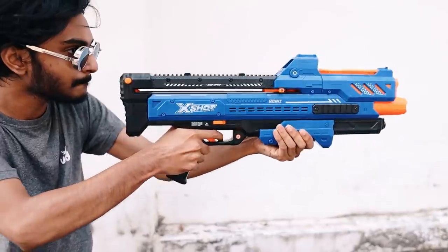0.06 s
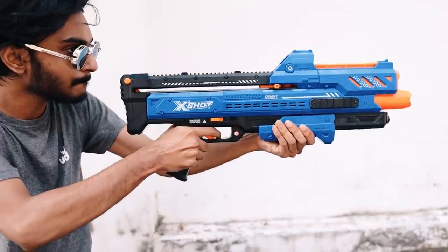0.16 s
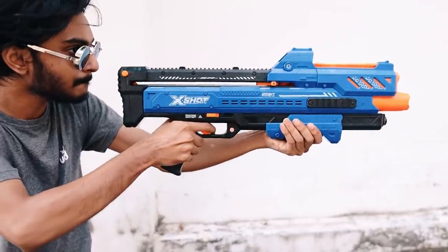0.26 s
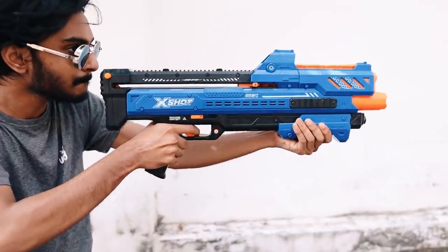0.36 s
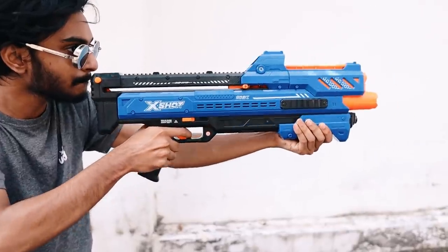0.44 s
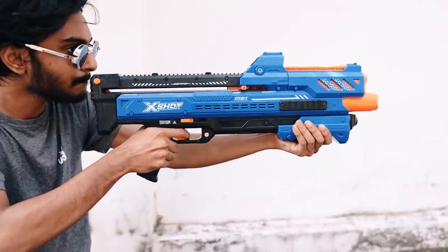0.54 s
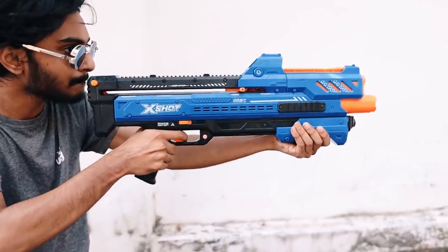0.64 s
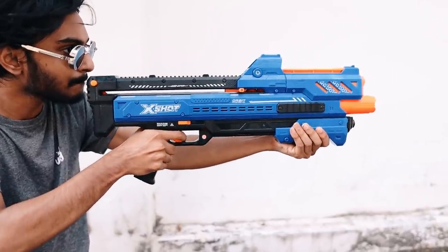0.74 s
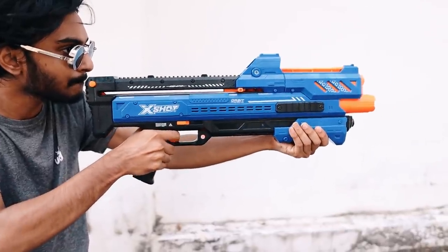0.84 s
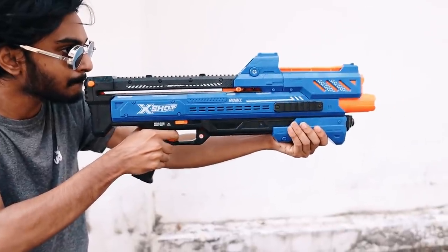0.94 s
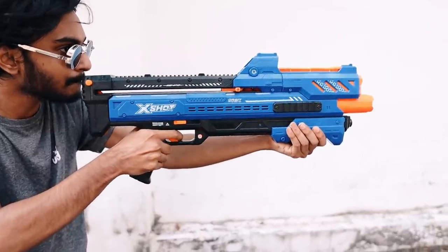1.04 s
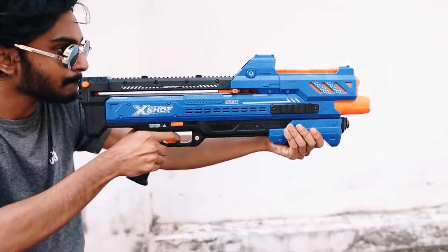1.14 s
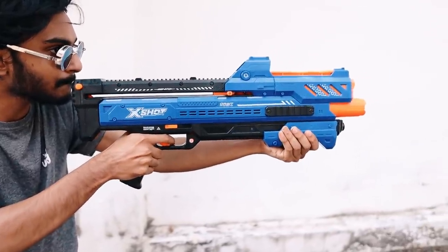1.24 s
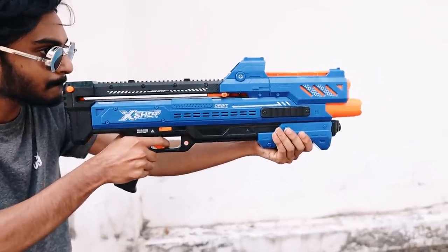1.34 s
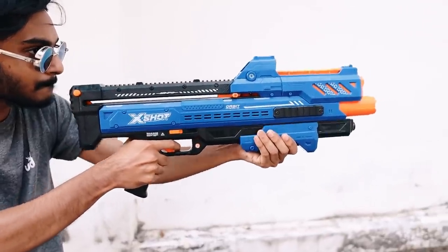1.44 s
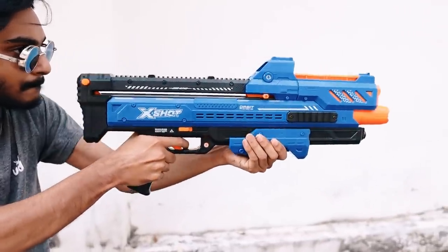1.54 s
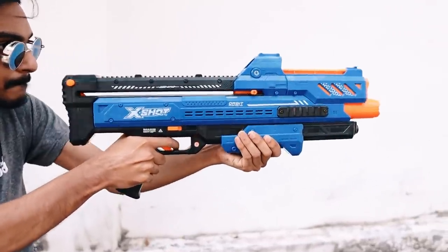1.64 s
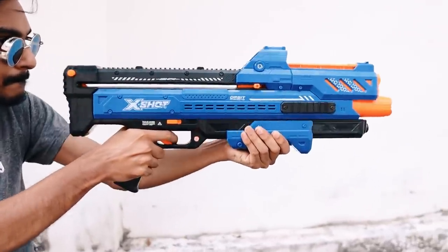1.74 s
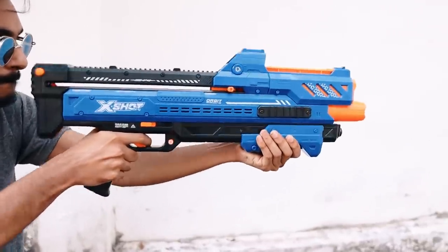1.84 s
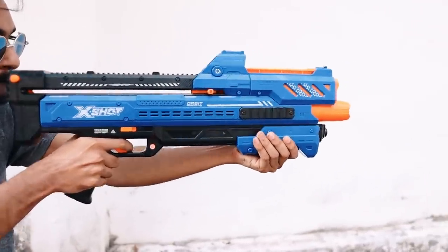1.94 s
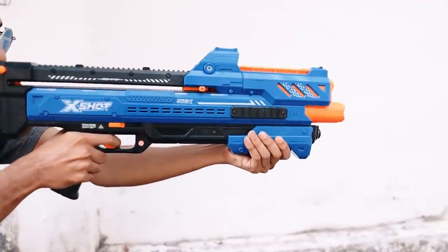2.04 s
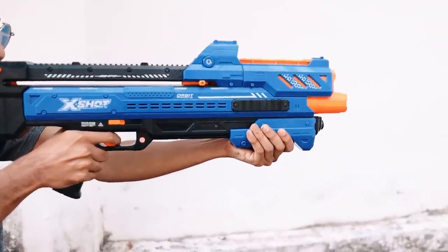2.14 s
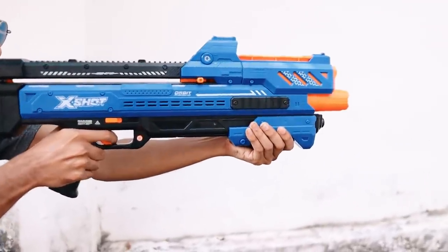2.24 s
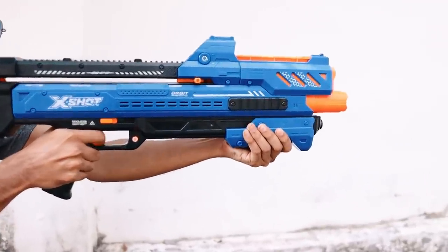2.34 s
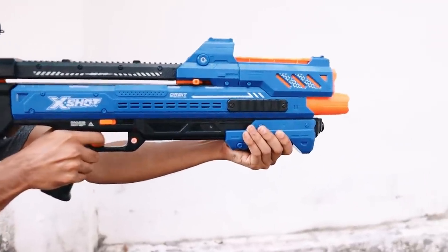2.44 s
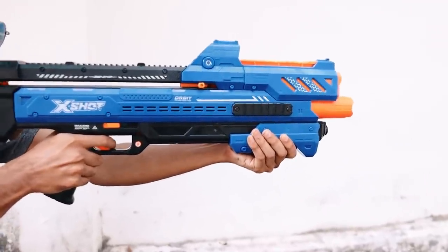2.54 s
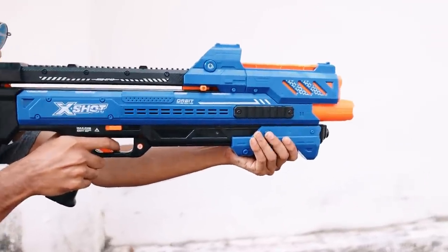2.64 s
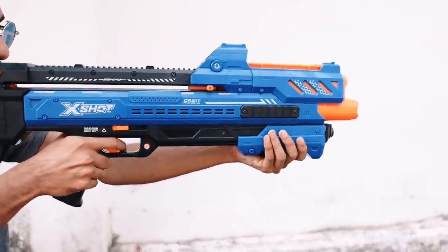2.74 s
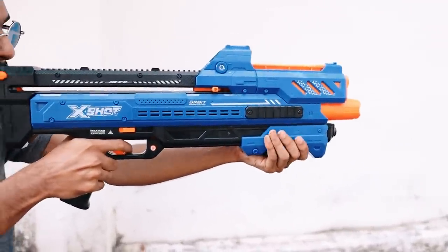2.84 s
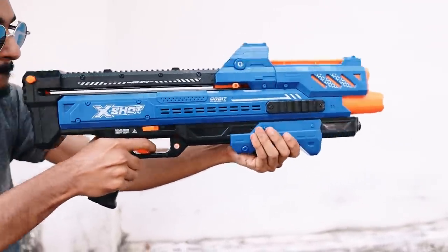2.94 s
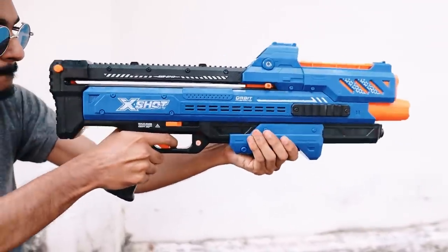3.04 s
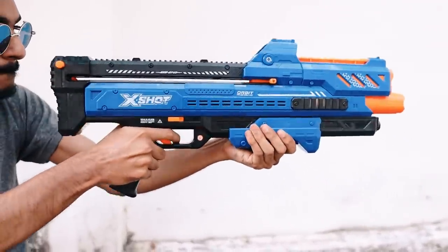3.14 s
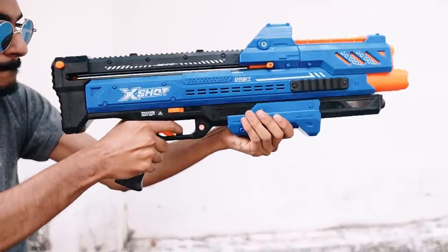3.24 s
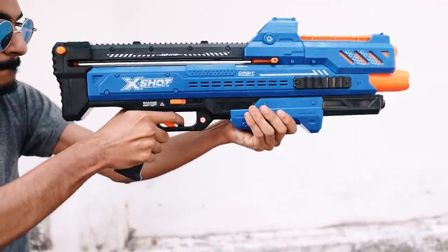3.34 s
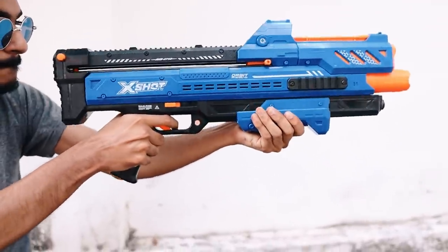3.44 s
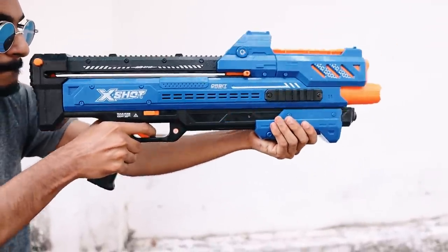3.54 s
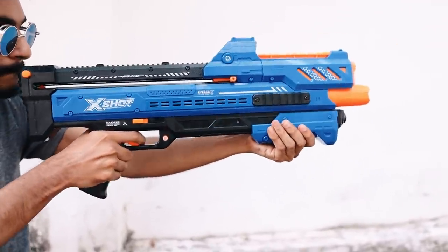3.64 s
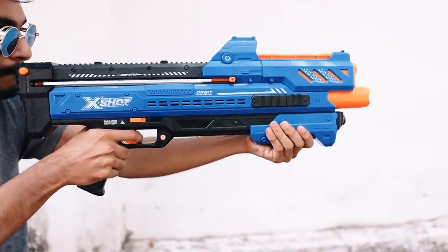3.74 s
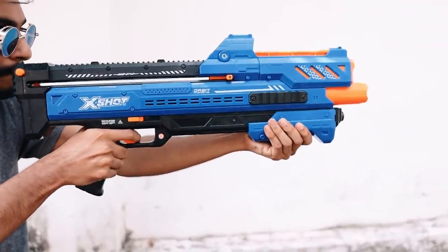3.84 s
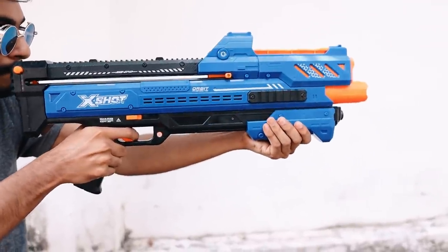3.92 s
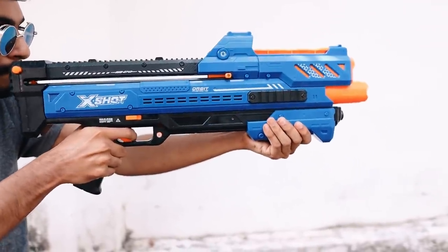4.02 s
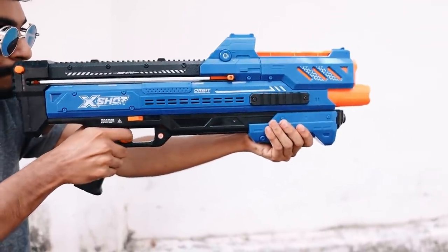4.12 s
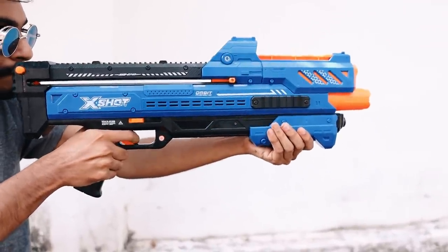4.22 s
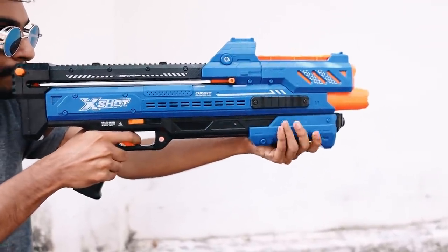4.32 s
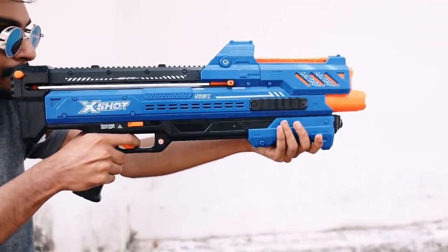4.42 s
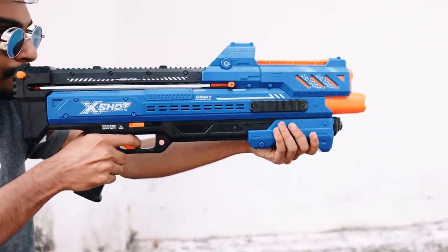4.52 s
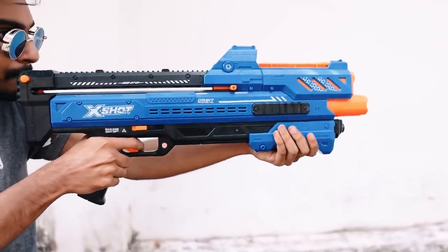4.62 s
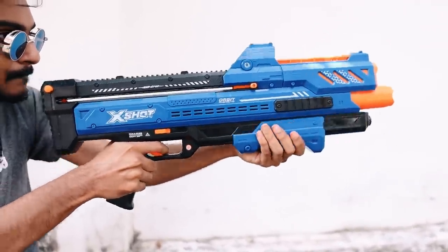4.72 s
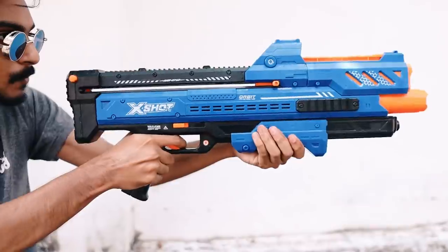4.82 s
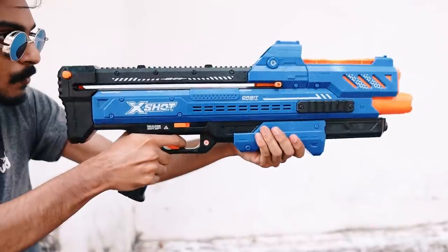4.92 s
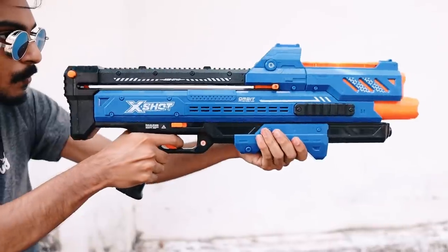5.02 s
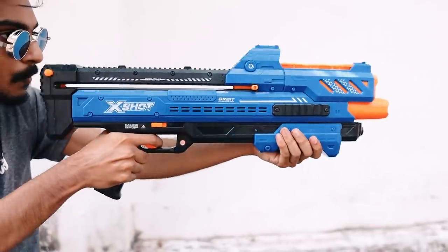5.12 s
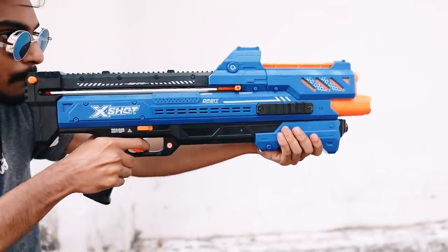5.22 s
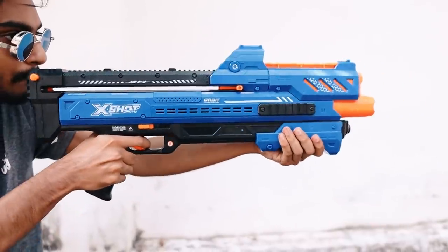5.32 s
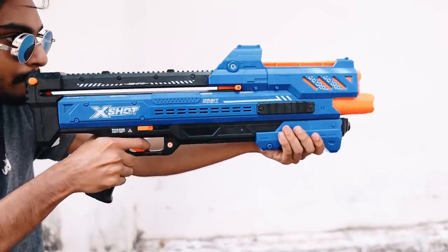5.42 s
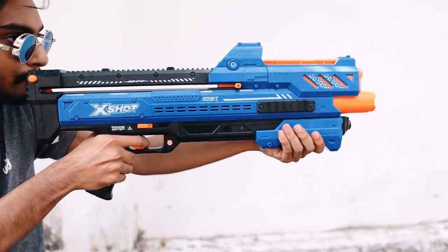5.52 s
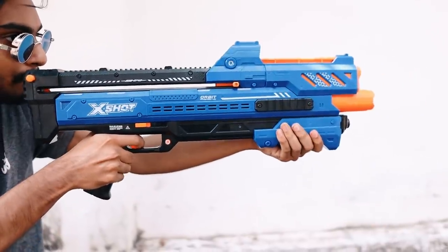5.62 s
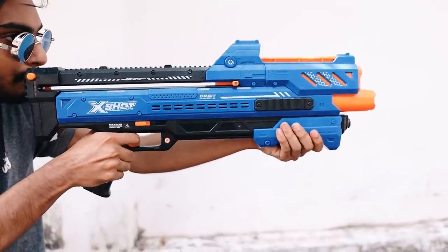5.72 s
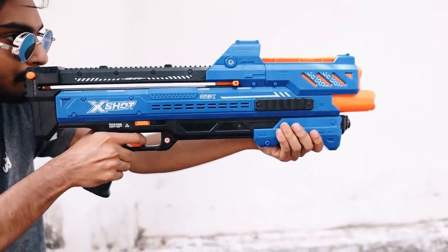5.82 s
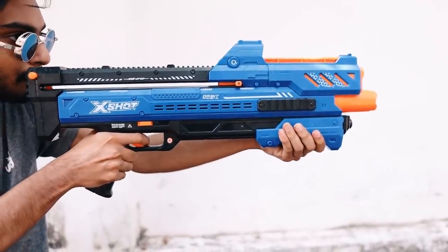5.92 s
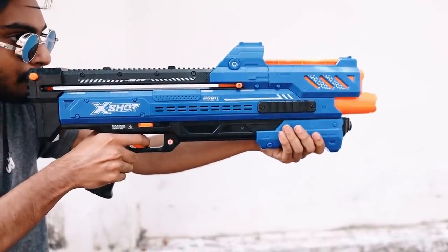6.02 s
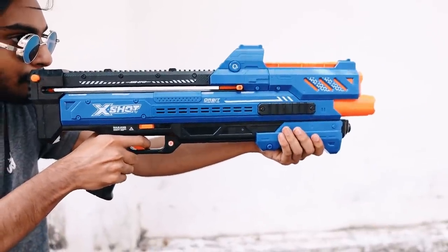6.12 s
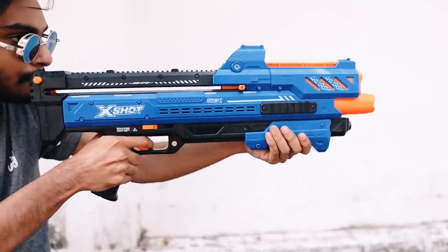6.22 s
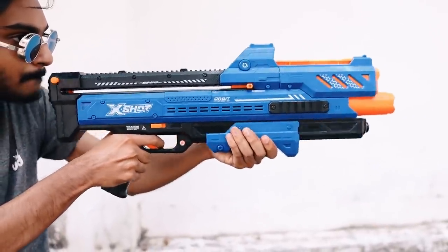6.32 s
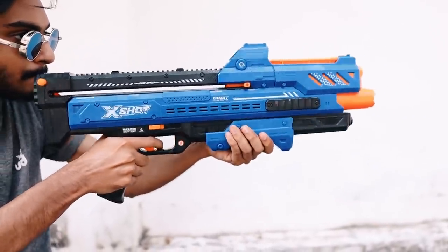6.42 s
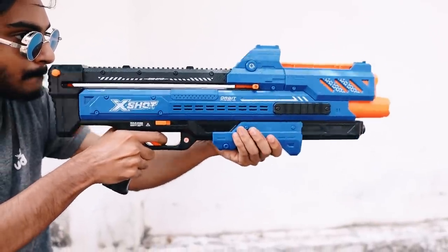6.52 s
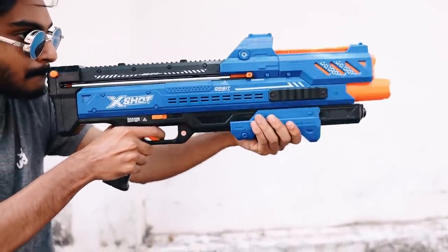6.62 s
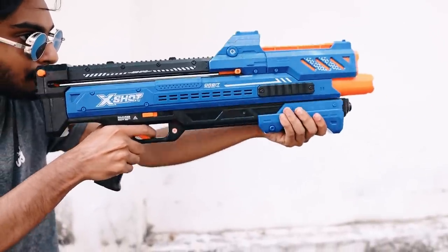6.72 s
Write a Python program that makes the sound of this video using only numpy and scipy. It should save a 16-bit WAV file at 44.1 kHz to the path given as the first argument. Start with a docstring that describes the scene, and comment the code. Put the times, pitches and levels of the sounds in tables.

```python
"""First comes a short rasp and a clack: the grip of a toy ball blaster slides back and latches, then rattles
forward. The trigger frees the plunger with a crack, and the ball pops from the barrel about 10 ms later.
The toy is cocked five times and fired four times, close to a stereo microphone in a hard-walled space.
Walls throw the shots back, three balls ping far off, and two thump into something hollow."""
import sys
import numpy as np
from scipy import signal
from scipy.fft import rfft, irfft, next_fast_len
from scipy.io import wavfile
from scipy.ndimage import uniform_filter1d

SR = 44100
rng = np.random.default_rng(int(sys.argv[2]) if len(sys.argv) > 2 else 0)


def master(y):
    """Save y as 16-bit WAV."""
    cut = np.clip(np.atleast_2d(y).T, -1, 1)
    pcm = np.round(cut * 32767)  # scale
    wavfile.write(sys.argv[1], SR, pcm.astype(np.int16))


N = 298204
BINS = np.fft.rfftfreq(4096, 1 / SR)  # f/Hz at which tone colours are drawn
AGE = np.arange(SR // 2) / SR  # t/s since a sound began

# Levels are relative. t60 is the time to fade by 60 dB. Tilt is treble gained per octave.
# colour of the distant drone and hiss: f/Hz, level/dB
DRONE_COLOUR = [(20, -8), (45, -9), (63, 9.5), (85, 0), (150, -6.5), (300, -10), (520, -7), (800, -10),
                (1800, -13), (3500, -18.5), (7000, -28), (12000, -34), (15500, -49)]
# puffs of air on the microphone: t/s, length/s, level/dB
GUST_TIMES = [(3.628, 0.15, -51.5), (3.888, 0.23, -40), (4.59, 0.11, -49), (5.223, 0.098, -30.5),
              (5.322, 0.038, -33.5), (6.044, 0.12, -39)]
# their colour: f/Hz, level/dB
GUST_COLOUR = [(20, -16), (70, 2), (160, -5.5), (260, -18), (600, -35), (2000, -82)]
# the microphone pair: f/Hz, likeness (0-1), left's phase lead/rad, left minus right/dB
MIC_PAIR = [(60, 1, 0, 0.5), (613, 0.86, 0.22, 0), (1410, 0.36, 0.05, -1), (2090, 0.34, 1, -5),
            (4120, 0.58, 2, 1), (6900, 0.35, 2, 0.5), (12600, 0.75, 3, 0.3)]
# how long the room rings: f/Hz, t60/s
ROOM_FADE = [(100, 0.97), (300, 0.76), (600, 0.76), (1500, 0.6), (3000, 0.44), (6000, 0.4), (12000, 0.31),
             (15000, 0.75)]
# colour of the room: f/Hz, level/dB
ROOM_COLOUR = [(60, -5), (150, -14), (250, 2.5), (400, 1.5), (580, -1.5), (850, -3.5), (1500, -1.5),
               (3000, 1.5), (6000, 2.5), (12500, -2), (14000, -15)]
# notes of a shot that hang between the walls: f/Hz, width/Hz, level/dB, t60/s
ROOM_NOTES = [(570, 95, -28.5, 0.62), (250, 24, -28.5, 0.52)]

# balls striking far off: t/s, f/Hz, level/dB, t60/s
FAR_HITS = [(2.484, 1430, -35, 0.78), (4.203, 1530, -36.5, 0.97), (5.793, 1450, -35, 0.96)]
# balls hitting a panel: t/s, boom/dB, pitch factor, tilt/dB, slap/dB, knock-back delay/s, its gain/dB
PANEL_HITS = [(2.8367, -12, 1, -3, -23.5, .0125, -5), (6.1772, -14, 1.01, 3, -19.5, .0095, -3)]
# notes of that hollow panel: f/Hz, level/dB, t60/s
PANEL_NOTES = [(160, -7.5, 0.42), (190, -8.5, 0.17), (233.5, -5.5, 0.16), (282.3, -8.5, 0.45),
               (326.5, 3, 0.16), (375, 1.5, 0.19), (442, -2, 0.39), (534, -9.5, 0.68), (598, -3.5, 0.21),
               (737, -28, 0.11), (826, -18, .18), (950, -28, 0.059), (1440, -31, .08)]
# colour of the ball's slap: f/Hz, level/dB
SLAP_COLOUR = [(25, -35), (90, -19), (180, -15), (400, 4), (750, 5), (1300, -5.5), (2000, -12.5),
               (3100, -13), (6000, -25.5), (9000, -31.5), (12000, -22.5), (15500, -40)]

# colour of the toy's plastic shell: f/Hz, level/dB
SHELL_COLOUR = [(60, -28), (200, -29.5), (380, -14.5), (550, -12.5), (800, -10), (1300, -4.5), (3200, 1.5),
                (5000, -1), (7000, -2.5), (9500, -7), (12000, -5), (15500, -30)]
# notes of the shell: f/Hz, width/Hz, boost/dB
SHELL_NOTES = [(548, 24, 6), (950, 40, 4), (1239, 60, 3), (1670, 120, 3.5), (1945, 70, 3), (2390, 80, 4.5),
               (2820, 90, 4), (3560, 130, 2.5), (4574, 120, 2.5), (5750, 180, 3.5), (6330, 130, 2),
               (7080, 220, 2), (9100, 150, 3.5), (11550, 400, 1)]
# light plastic ticks and rattles from handling, firing, the returning trigger and the settling grip:
# t/s, level/dB
SMALL_KNOCKS = [(0.2858, -36), (0.294, -45), (.635, -41.5), (.7028, -40.5), (.7711, -43.5), (.9344, -28),
                (1.626, -25.5), (2.0977, -47), (2.1972, -39.5), (2.291, -41), (2.3255, -44), (3.426, -35),
                (3.895, -39), (3.933, -47), (4.0008, -37), (4.344, -27.5), (4.3654, -33), (4.398, -30.5),
                (4.5534, -40.5), (4.573, -39), (4.6427, -41), (5.031, -35), (5.07, -35), (5.5112, -37),
                (5.5577, -41), (5.5917, -40), (6.219, -27), (6.498, -22), (6.5288, -37), (6.5857, -40),
                (6.625, -45)]
# path of the trigger's squeak: t/s, f/Hz, level/dB
SQUEAK_PATH = [(4.005, 4900, -68), (4.025, 5350, -53), (4.075, 5450, -56), (4.11, 5450, -70)]
# notes of the cocked spring: f/Hz, width/Hz, level/dB, t60/s
SPRING_NOTES = [(4620, 270, -42, .25), (5800, 100, -40, 0.27), (9600, 690, -52, 0.45),
                (11180, 1000, -35, 0.34), (12000, 900, -43.5, .4)]
# notes of the hollow body: f/Hz, level/dB, t60/s
BODY_NOTES = [(129, -28.5, 0.088), (355, -14.5, 0.059), (469, -15, 0.031), (562, -8, 0.094),
              (914, -1.5, 0.04), (1240, -4, 0.058), (1727, -10, 0.017), (2520, 2, 0.013)]
# colour of the rail that the grip slides on: f/Hz, level/dB
RAIL_COLOUR = [(60, -22), (200, -21), (380, -6), (520, 1), (800, -1), (1300, 1.5), (2300, 1.5), (3400, 4),
               (5000, -0.5), (7000, -6), (9500, -6.5), (12000, -11), (15500, -49)]
# notes rubbed out of the rail: f/Hz, width/Hz, level/dB
RUBBED_NOTES = [(1202, 70, -18), (2123, 110, -12), (2810, 120, -13), (3410, 180, -11)]
# grip pulled back: start/s, fastest/s, end/s, latch/s, rasp/dB, latch/dB, thud/dB, wait to ease off/s
GRIP_PULLS = [(0, 0.004, 0.073, 0.05, -30, -7, -27, 0.107),
              (1.378, 1.445, 1.557, 1.5572, -24.5, -6.5, -19, .1),
              (2.88, 2.965, 3.06, 3.2175, -25, -6.5, -22, .1215),
              (4.686, 4.742, 4.82, 4.824, -21.5, -5.5, -18, .106),
              (6.24, 6.275, 6.39, 6.3749, -23, -6.5, -19, 0.123)]
# grip pushed forward: ball pick-up/s, front stop/s, force/dB, thud/dB
GRIP_PUSHES = [(0.3204, 0.455, -4.5, -24.5), (1.8286, 1.934, -1, -20), (3.506, 3.62, -0.5, -25.5),
               (5.115, 5.219, 0.5, -21.5), (6.6675, 6.751, -0.5, -16.5)]
# the slide snags on the spring on its way back: t/s, level/dB, tilt/dB
PULL_SNAGS = [(0.0267, -13, -1.5), (1.4206, -24, 13), (1.433, -29, 0), (1.442, -27, 5), (1.458, -15, 0),
              (1.4883, -15, -1), (1.543, -11.5, -2), (2.9344, -26, 7), (2.957, -16, 1),
              (2.9688, -13.5, -1.5), (2.9825, -20.5, -4.5), (2.994, -15, -2), (3.06, -11.5, -2),
              (3.124, -13, -4.5), (3.14, -21.5, -7), (4.703, -37, -4), (4.7123, -23, 4),
              (4.7323, -18.5, -3), (4.7461, -9.5, -2), (4.7666, -12.5, -3.5), (4.806, -8.5, -2.5),
              (4.8215, -12, -5.5), (6.257, -19.5, 3), (6.274, -16, 2), (6.2864, -15, -1),
              (6.3103, -19, 0.5), (6.356, -11.5, -3)]
# knocks as the plunger latches: delay/s, level/dB, tilt/dB
LATCH_KNOCKS = [(0, 1.5, 1), (.005, -8, -7)]
# knocks as the hand eases off: delay/s, level/dB, tilt/dB
EASE_KNOCKS = [(0, -25.5, -5.5), (.011, -39, -5.5)]
# catches that a push passes: share of the way from pick-up to stop (0-1), level/dB, tilt/dB
PUSH_CATCHES = [(0, -13.5, 0), (0.169, -13.5, 0.5), (0.581, -23.5, -2), (0.686, -14, 1.3),
                (0.859, -14, -0.5)]
# knocks at the front stop: delay/s, level/dB, tilt/dB
STOP_KNOCKS = [(0, -11.5, 2.5), (.003, -11.5, -5.5), (.01, -20, -6), (.03, -29, -0.5)]
# knocks of the squeezed trigger: t/s from the shot, level/dB, tilt/dB
TRIGGER_KNOCKS = [(-.033, -32, -6.5), (-.025, -37, -6.5)]

# shots: t/s, crack/dB, pop delay/s, pop/dB, barrel ring/dB, echo/dB, trigger return delay/s, its knock/dB
FIRINGS = [(0.9002, -3.5, 0.011, -6, 9.5, -26, .15, -33.5), (2.4, -2.5, 0.01, 2, -1, -14, 0.18, -29),
           (4.121, -2.5, .0097, 1.5, 1.5, -11.5, .271, -25.5),
           (5.7125, -3, 0.0097, -1.5, 8, -11.5, 0.17, -28.5)]
# colour of the plunger's crack: f/Hz, level/dB
CRACK_COLOUR = [(40, -9.5), (200, -15), (520, -16), (720, -14.5), (1020, -30), (1330, -9), (1700, -4.5),
                (2600, -4), (3600, -7.5), (5000, -14), (8500, -19.5), (12000, -17.5), (15500, -30)]
# notes of the air chamber that the plunger slams into: f/Hz, level/dB, t60/s
CHAMBER_NOTES = [(902, -16, 0.038), (1248, 0.5, 0.018), (1870, -19, 0.031), (2410, -31, 0.029),
                 (3100, -19, 0.016)]
# colour of the air escaping behind the ball: f/Hz, level/dB
PUFF_COLOUR = [(60, -5), (220, 3), (380, -12), (700, 9.5), (1400, -2.5), (2500, -2.5), (4000, -30),
               (8000, -18), (12000, -33), (15500, -27)]
# notes of the air in the barrel: f/Hz, level/dB, t60/s
BARREL_NOTES = [(565, -16.5, 0.073), (443, -48, 0.024), (1390, -16, 0.021), (950, -8, 0.0065)]


def amp(db):
    """Turns decibels into a gain."""
    return 10 ** (np.asarray(db) / 20)


def unit(x):
    """Scales a sound to an average power of 1."""
    return x / np.sqrt(np.mean(x ** 2) + 1e-20)


def read(points, hz, column=1):
    """Reads a table between its rows, on a log-frequency scale."""
    table = np.transpose(points)
    return np.interp(np.log(hz + 1), np.log(table[0] + 1), table[column])


def add(mix, s, sound):
    """Lays a sound into the mix at time s."""
    part = mix[:, max(round(s * SR), 0):][:, :sound.shape[-1]]
    part += sound[..., :part.shape[-1]]


def later(x, delay):
    """The same sound, delay seconds later."""
    out = np.zeros((2, N))
    add(out, delay, x)
    return out


def ring(gain_db):
    """How a thing with this tone colour rings after one tap, scaled to energy 1."""
    log_gain = np.log(amp(np.r_[gain_db, gain_db[-2:0:-1]]))
    response = irfft(np.exp(np.conj(signal.hilbert(log_gain)))[:len(BINS)])
    return response / np.linalg.norm(response)


def through(x, response):
    """Filters each channel with a ring and keeps the length."""
    return signal.oaconvolve(x, np.atleast_2d(response), axes=1)[:, :x.shape[1]]


def tint(x, colour):
    """Gives a sound the tone colour in a table."""
    return through(x, ring(read(colour, BINS)))


def noise(size):
    """Two channels of plain hiss."""
    return rng.standard_normal((2, size))


def breathy_note(hiss, hz, width):
    """Narrows hiss to a band around one pitch."""
    return unit(through(hiss, ring(-20 * np.log10(1 + (2 * (BINS - hz) / width) ** 2))))


def gliding_note(x, hz, width):
    """Lets x ring a note whose pitch follows the curve hz."""
    turn = np.exp(2j * np.pi * np.cumsum(hz) / SR)
    kept = np.exp(-np.pi * width / SR)
    return (turn * signal.lfilter([np.sqrt(2 * (1 - kept ** 2))], [1, -kept], x / turn)).real


def burst(rise, hold, decay, size=4096):
    """Evened-out hiss that rises, holds and dies away; times are in seconds."""
    t, hiss = AGE[:size], noise(size)
    hiss /= np.sqrt(uniform_filter1d(hiss ** 2, size=40))
    return hiss * (1 - np.exp(-t / rise)) * np.exp(-np.maximum(t - hold, 0) / decay)


def mics(x):
    """Two spaced microphones hear bass alike and treble nearly opposed."""
    size = next_fast_len(x.shape[1] + 2048, True)
    left, other = rfft(x, size)
    hz = np.fft.rfftfreq(size, 1 / SR)
    same = np.clip(read(MIC_PAIR, hz), 0, 1)
    lean = amp(read(MIC_PAIR, hz, column=3) / 2)
    right = (same * left + np.sqrt(1 - same ** 2) * other) * np.exp(-1j * read(MIC_PAIR, hz, column=2))
    return irfft(np.array([left * lean, right / lean]), size)[:, :x.shape[1]]


def background():
    """Distant drone and hiss, with light puffs of air on the microphone."""
    puffs = np.zeros((2, N))
    for s, length, db in GUST_TIMES:
        add(puffs, s, amp(db) * np.hanning(round(length * SR)))
    air = tint(puffs * noise(N), GUST_COLOUR)
    return mics(air + amp(-49.5) * tint(noise(N), DRONE_COLOUR))


def walls(x):
    """The walls return each pitch as a fading wash of noise; the bass lasts longest."""
    hz, t, spectrum = signal.stft(x, SR, nperseg=512)
    power = (abs(spectrum) ** 2).mean(0)
    # treble leaves the toy differently in every direction, which evens out its fine peaks
    evened = np.clip(hz / 3000, 0, 1)[:, None]
    power = (1 - evened) * power + evened * uniform_filter1d(power, size=7, axis=0)
    lag = t[t < 1]
    arrival = 1 - 0.33 * np.exp(-(lag / 0.033) ** 4)
    fade_db = read(ROOM_COLOUR, hz)[:, None] - 60 * lag / read(ROOM_FADE, hz)[:, None]
    decay = (arrival * amp(fade_db)) ** 2
    power = signal.fftconvolve(power, decay / decay.sum(1).max(), axes=1)[:, :len(t)]
    hiss = signal.stft(noise(N), SR, nperseg=512)[2]
    tail = hiss / np.std(hiss) * np.sqrt(abs(power))
    return mics(signal.istft(tail, SR, nperseg=512)[1][:, :N])


def hanging_notes():
    """The barrel's notes swell and fade in the room; a strong barrel ring favours the upper one."""
    out = np.zeros((2, N))
    swell = 1 - np.exp(-(AGE / 0.042) ** 2)
    for s, _, delay, _, ring_db, *_ in FIRINGS:
        for hz, width, db, t60 in ROOM_NOTES:
            hiss = noise(len(AGE))
            note = breathy_note(hiss[:1] + 0.17 * hiss, hz, width)
            add(out, s + delay, amp(db + ring_db * np.log2(hz / 450) - 60 * AGE / t60) * note * swell)
    return out


def far_pings():
    """A ball strikes far off: one hollow note, drawn out by the walls."""
    out = np.zeros((2, N))
    for s, hz, db, t60 in FAR_HITS:
        level = amp(db) * (amp(-60 * AGE / t60) + amp(6) * np.exp(-AGE / 0.027))
        add(out, s, level * breathy_note(noise(len(AGE)), hz, width=320))
    return mics(out)


def panel_thumps(roughness=0.54, flutter_s=0.0119):
    """A ball slaps a hollow panel, which booms, flutters in its frame and knocks back against it."""
    out = np.zeros((2, N))
    depth = roughness * np.minimum(AGE / flutter_s, 1)
    for s, db, pitch, tilt_db, slap_db, rebound, rebound_db in PANEL_HITS:
        for k, (hz, note_db, t60) in enumerate(PANEL_NOTES):
            shake = rng.standard_normal(len(BINS)) + 1j * rng.standard_normal(len(BINS))
            flutter = np.interp(AGE / flutter_s, np.arange(len(BINS)), shake)
            swing = (1 + depth * flutter) * np.exp(2j * np.pi * hz * pitch * AGE)
            level = amp(db + note_db + tilt_db * np.log2(hz / 320) - 60 * AGE / t60)
            add(out, s, (-1) ** k * level * swing.imag * amp([[-5], [-1]]))  # louder on the right
        slap = amp(7) * burst(rise=.00005, hold=.001, decay=.001)
        slap += amp(-2) * burst(rise=.0005, hold=.014, decay=.025)
        add(slap, rebound, amp(rebound_db + 2) * burst(rise=0.0012, hold=0.0066, decay=0.006))
        add(out, s, amp(slap_db) * mics(tint(slap, SLAP_COLOUR)))
    return out


def shell(tilt_db, colour=SHELL_COLOUR, spot_db=2.5, spot_width_hz=110):
    """The shell's ring: each spot stirs its notes differently and adds small peaks of its own."""
    stirred = 1 + .45 * rng.standard_normal(len(SHELL_NOTES))
    peaks_db = sum(share * db / (1 + (2 * (BINS - hz) / width) ** 2)
                   for share, (hz, width, db) in zip(stirred, SHELL_NOTES))
    ripple = np.interp(BINS / spot_width_hz, np.arange(len(BINS)), rng.standard_normal(len(BINS)))
    treble_db = tilt_db * np.log2(np.maximum(BINS, 500) / 3000)  # hard contacts are brighter
    return ring(read(colour, BINS) + peaks_db + spot_db * ripple + treble_db)


def handling(creaks_per_s=40):
    """Faint creaks of the shell in the hands."""
    ticks = (rng.random(N) < creaks_per_s / SR) * amp(1.8 * np.minimum(rng.exponential(1, N), 2))
    creak = through(burst(rise=0.0012, hold=0.00069, decay=0.0033), shell(tilt_db=7.5))
    return amp(-56) * mics(through(np.array([ticks, ticks]), creak))


def trigger_squeak():
    """One thin, wavering glide of plastic on plastic."""
    s, hz, db = np.transpose(SQUEAK_PATH)
    t = np.arange(s[0], s[-1], 1 / SR)
    waver = 1 + .04 * unit(uniform_filter1d(rng.standard_normal(len(t)), size=30))
    phase = 2 * np.pi * np.cumsum(np.interp(t, s, hz) * waver) / SR
    return later(amp(np.interp(t, s, db)) * np.sin(phase), s[0])


def spring_sizzle():
    """The latch jolts the squeezed spring, whose high notes sizzle on."""
    out = np.zeros((2, N))
    for _, _, _, latch, *_ in GRIP_PULLS:
        for hz, width, db, t60 in SPRING_NOTES:
            add(out, latch, amp(db - 60 * AGE / t60) * breathy_note(noise(len(AGE)), hz, width))
    return mics(out)


def strokes(lead_s=.048, overrun_s=.012, ram_share=.57):
    """Lists every slide: start/s, fastest/s, end/s, then level/dB at each of the three."""
    pulls = [(start, fastest, end, db - 12, db, db - 6) for start, fastest, end, _, db, *_ in GRIP_PULLS]
    pushes, rams = [], []
    for pick_up, stop, db, _ in GRIP_PUSHES:
        pushes.append((pick_up - lead_s, stop, stop + overrun_s, db - 40, db - 27.5, db - 51))
        ram_start = pick_up + ram_share * (stop - pick_up)  # the ball is rammed home
        rams.append((ram_start, stop, stop + overrun_s, db - 36, db - 23, db - 42))
    trigger_rubs = [(s - .11, s - .013, s - .00078, -57.5, -45, -51) for s, *_ in FIRINGS]
    return pulls + pushes + rams + trigger_rubs


def sliding_rasp(slips_per_s=190, slip_s=.0007, slip_spread_db=5, smooth_share=.08, glide=.053):
    """Sliding parts stick and slip: tiny ticks and a few rising rubbed notes, louder with speed."""
    out = np.zeros((2, N))
    for start, fastest, end, *levels_db in strokes():
        t = start + AGE[:SR // 4]
        speed = amp(np.interp(t, [start, fastest, end], levels_db)) * (t < end)
        slipping = rng.random(len(t)) < slips_per_s / SR
        slips = slipping * amp(slip_spread_db * np.minimum(rng.exponential(1, len(t)), 2))
        friction = signal.lfilter([1], [1, -np.exp(-1 / (slip_s * SR))], slips) + smooth_share
        scrape = speed * unit(np.sqrt(friction)) * noise(len(t))
        # the contact point travels and presses harder, so dull turns to bright
        travel = np.pi / 2 * np.clip((t - start) / (fastest - start), 0, 1)
        add(out, start, through(scrape * np.cos(travel), shell(tilt_db=-3, colour=RAIL_COLOUR)))
        add(out, start, through(scrape[::-1] * np.sin(travel), shell(tilt_db=-1.5, colour=RAIL_COLOUR)))
        bend = 1 + glide * (np.clip((t - start) / (end - start), 0, 1) - .5)
        for hz, width, db in RUBBED_NOTES:
            detune = 1 + .14 * rng.uniform(-1.35, 1)
            add(out, start, amp(db) * gliding_note(scrape * np.sin(travel), hz * bend * detune, width))
    return mics(out)


def body_thuds(rebound_s=.0057):
    """The whole body knocks woodily: as a pull starts, at the latch, and twice at the front stop."""
    starts = [(start, db - 8) for start, _, _, _, db, *_ in GRIP_PULLS]
    latches = [(latch, db) for _, _, _, latch, _, _, db, _ in GRIP_PULLS]
    stops = [(stop, db) for _, stop, _, db in GRIP_PUSHES]
    rebounds = [(s + rebound_s, db - 6) for s, db in stops]
    out, t = np.zeros((2, N)), AGE[:len(BINS) * 2]
    for s, db in starts + latches + stops + rebounds:
        phases = rng.uniform(0, 2 * np.pi, len(BODY_NOTES))
        knock = sum(amp(note_db - 60 * t / t60) * np.sin(2 * np.pi * hz * t + phase)
                    for phase, (hz, note_db, t60) in zip(phases, BODY_NOTES))
        add(out, s, amp(db) * knock * (1 - np.exp(-t / .0008)) * amp([[.5], [3]]))
    return out


def knocks(chatter_s=.004, snag_s=.003, tick_s=.0028, tick_tilt_db=-6.5, release_tilt_db=-7):
    """Lists every plastic knock, snag and light tick: t/s, level/dB, tilt/dB, decay/s."""
    steps = []  # t/s, force/dB, knocks
    for _, _, _, latch, _, latch_db, _, ease in GRIP_PULLS:
        steps += [(latch, latch_db, LATCH_KNOCKS), (latch + ease, 0, EASE_KNOCKS)]
    for pick_up, stop, force_db, _ in GRIP_PUSHES:
        catches = [(share * (stop - pick_up), db, tilt_db) for share, db, tilt_db in PUSH_CATCHES]
        steps += [(pick_up, force_db, catches), (stop, force_db, STOP_KNOCKS)]
    for s, *_, release, release_db in FIRINGS:
        steps += [(s, 0, TRIGGER_KNOCKS), (s, release_db, [(release, 0, release_tilt_db)])]
    action = [(s + delay, force_db + db, tilt_db, chatter_s)
              for s, force_db, step in steps for delay, db, tilt_db in step]
    snags = [(*snag, snag_s) for snag in PULL_SNAGS]
    ticks = [(s, db, tick_tilt_db, tick_s) for s, db in SMALL_KNOCKS]
    return action + snags + ticks


def clacks():
    """Each knock chatters in the shell for a few milliseconds and leaves loose parts buzzing."""
    out = np.zeros((2, N))
    for s, db, tilt_db, decay in knocks():
        knock = amp(db) * burst(rise=0.0011, hold=0.00096, decay=decay)
        # loose parts have little room to move, so their buzz grows more slowly than a hard blow
        buzz = amp(min(.5 * db - 22, db - 7.5)) * burst(rise=.003, hold=.004, decay=.012)
        add(out, s, through(knock + buzz, shell(tilt_db)))
    return amp(2.5) * mics(out)


def ball_pop(ring_db, width_s=.00032, swell_s=.0001, low_cut_hz=50):
    """The ball leaves: air sucks in and overshoots, returns once down the barrel and rings it briefly."""
    u = AGE / width_s
    pulse = -u * (2 - u) * np.exp(-u) * amp(7.5)
    returned = amp(-21) * np.interp(AGE - .0033, AGE, pulse, left=0)
    tube = -sum(amp(db + ring_db - 60 * AGE / t60) * np.cos(2 * np.pi * hz * (AGE - swell_s))
                for hz, db, t60 in BARREL_NOTES)
    air = pulse + returned + tube * (1 - np.exp(-AGE / swell_s)) * np.exp(-(AGE / 0.02) ** 4)
    # the pop carries little deep bass
    return signal.lfilter(*signal.butter(1, low_cut_hz, "high", fs=SR), air)


def shots(echo_s=.078, echo_cut_hz=2600):
    """The plunger cracks in its chamber and the ball pops; the wall ahead scatters a dull echo."""
    near, far = np.zeros((2, N)), np.zeros((2, N))
    for s, crack_db, delay, pop_db, ring_db, echo_db, *_ in FIRINGS:
        shot = np.zeros((2, len(AGE)))
        crack = burst(rise=0.00028, hold=0.0028, decay=0.0023)
        crack += amp(-9) * burst(rise=0.00045, hold=0.0086, decay=0.0064)
        add(shot, 0, amp(crack_db - 3.5) * tint(crack, CRACK_COLOUR))
        puff = burst(rise=.0003, hold=.0025, decay=.004)
        add(shot, delay, amp(pop_db - 10) * tint(puff, PUFF_COLOUR))
        shot = mics(shot)
        chamber = sum(amp(db - 60 * AGE / t60) * np.sin(2 * np.pi * (hz * AGE + rng.random()))
                      for hz, db, t60 in CHAMBER_NOTES)
        add(shot, 0, amp(crack_db) * chamber * (1 - np.exp(-AGE / 0.00072)))
        add(shot, delay, amp(pop_db) * ball_pop(ring_db) * amp([[-1], [1]]))
        add(near, s, shot)
        add(far, s, amp(echo_db) * shot)
    scatter = noise(len(AGE)) * np.exp(-abs(AGE - echo_s) / .009)
    dull = ring(-10 * np.log10(1 + (BINS / echo_cut_hz) ** 4))
    scatter = mics(through(scatter / np.linalg.norm(scatter[0]), dull))
    return near, amp(-14.5) * through(far[:1].repeat(2, axis=0), scatter)


def scene():
    """The blaster close by, and the room around it."""
    action = clacks() + body_thuds() + sliding_rasp() + handling() + trigger_squeak()
    fire, echo = shots()
    landing = panel_thumps()
    to_walls = later(amp(-10) * action + amp(-6) * landing, delay=.005)
    # the shot is aimed forward, so the room answers it later than the rattles
    to_walls += later(amp(-8.5) * fire, delay=.025)
    blaster = action + spring_sizzle() + fire
    return blaster + echo + landing + walls(to_walls) + hanging_notes() + far_pings() + background()


def record(dry):
    """The loudest peaks are clipped, then the highest treble is cut."""
    treble_cut = signal.firwin(255, cutoff=15900, window=("kaiser", 8), fs=SR)
    return signal.oaconvolve(np.clip(dry, -1, 1), treble_cut[None], "same")


dry = scene()
out = record(dry)
master(out)
```